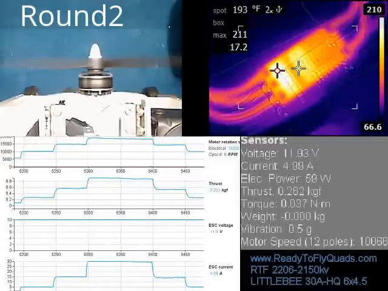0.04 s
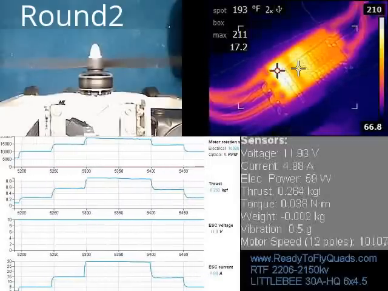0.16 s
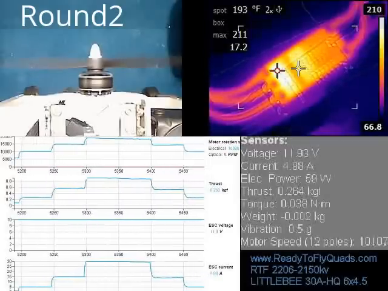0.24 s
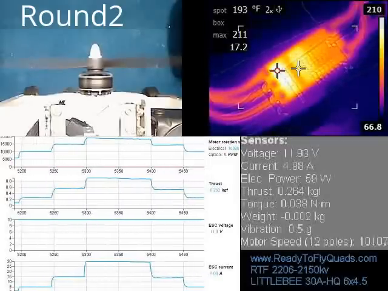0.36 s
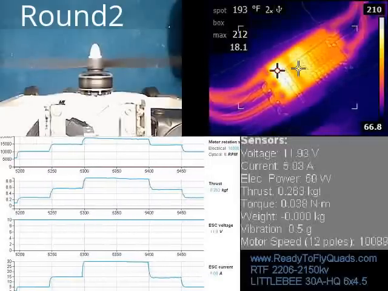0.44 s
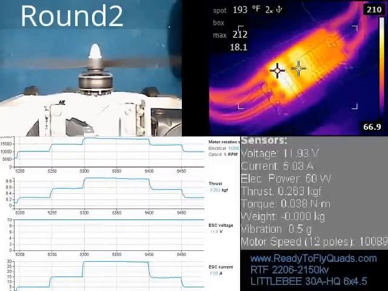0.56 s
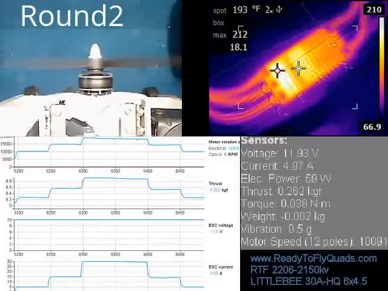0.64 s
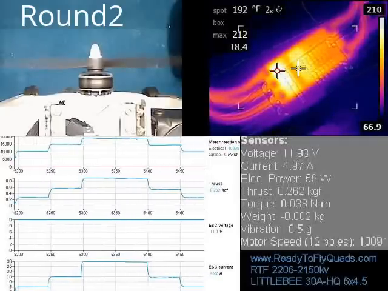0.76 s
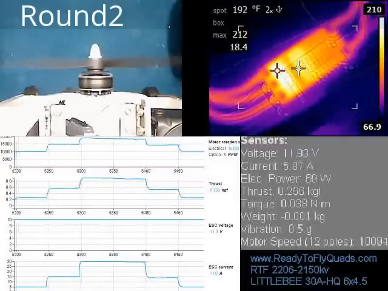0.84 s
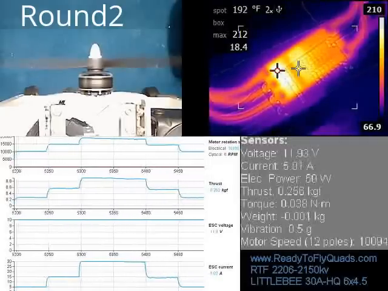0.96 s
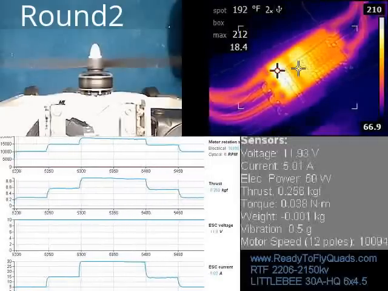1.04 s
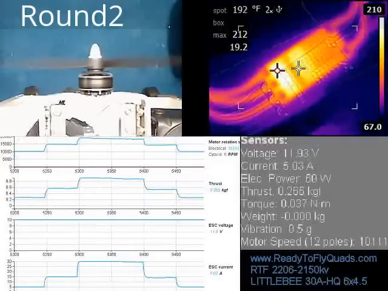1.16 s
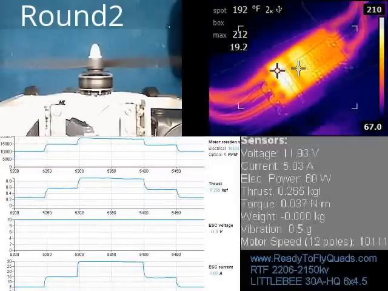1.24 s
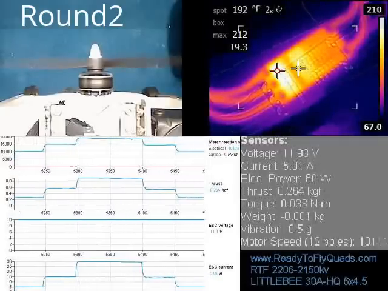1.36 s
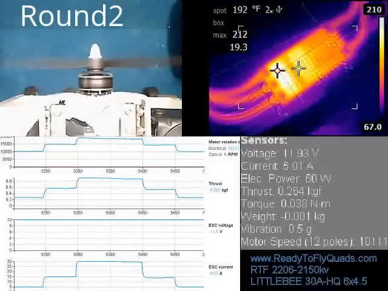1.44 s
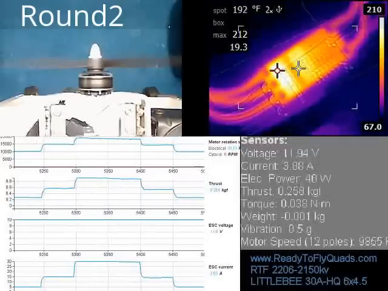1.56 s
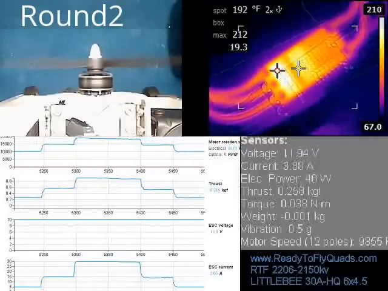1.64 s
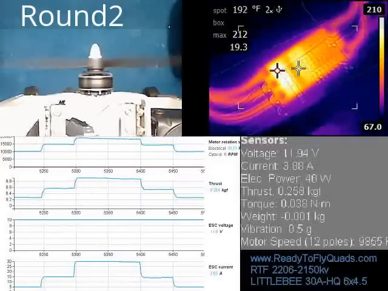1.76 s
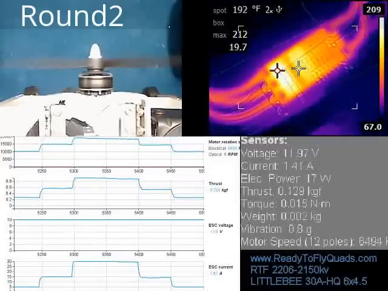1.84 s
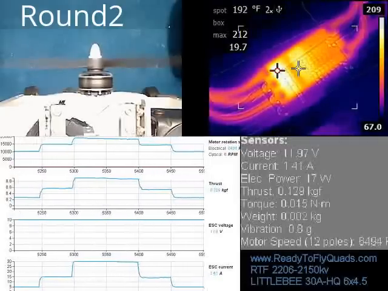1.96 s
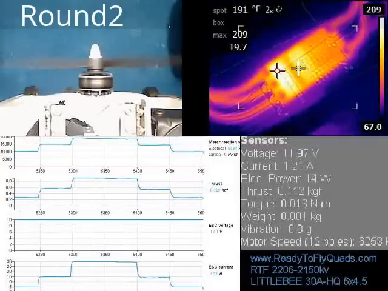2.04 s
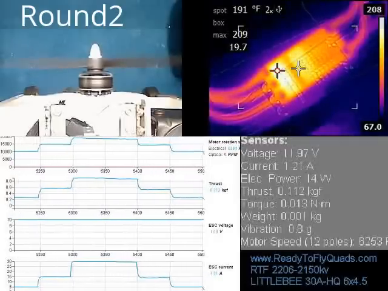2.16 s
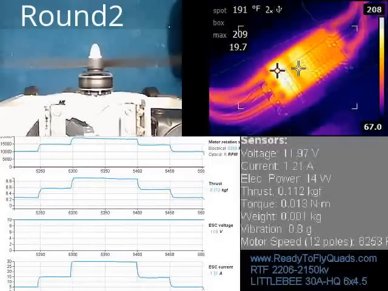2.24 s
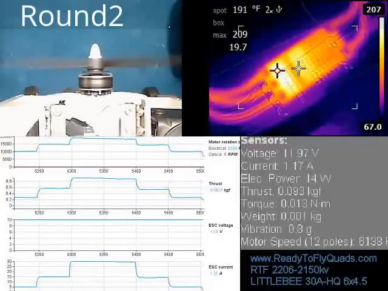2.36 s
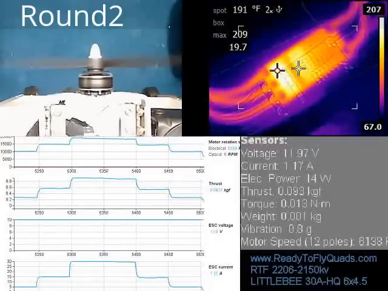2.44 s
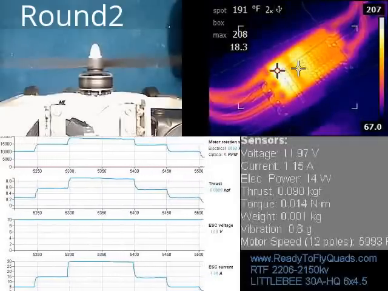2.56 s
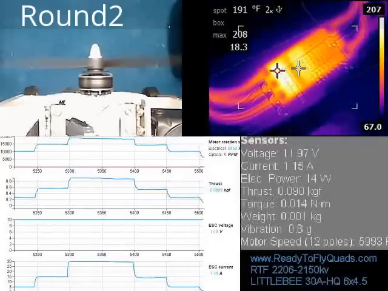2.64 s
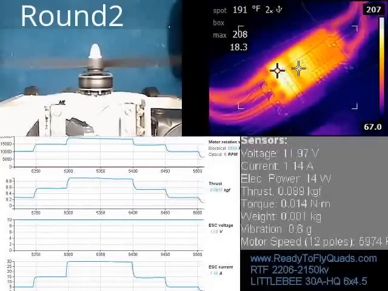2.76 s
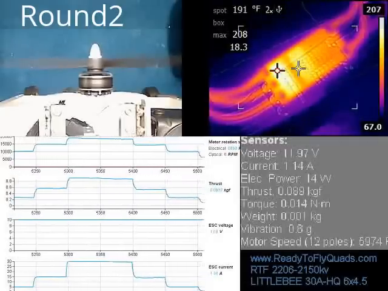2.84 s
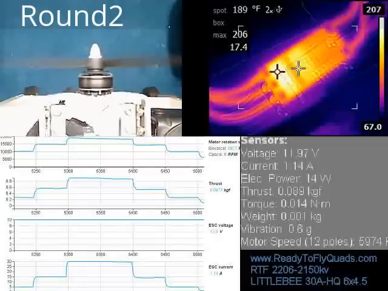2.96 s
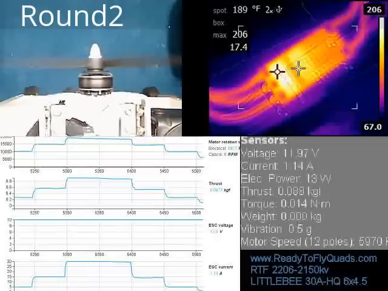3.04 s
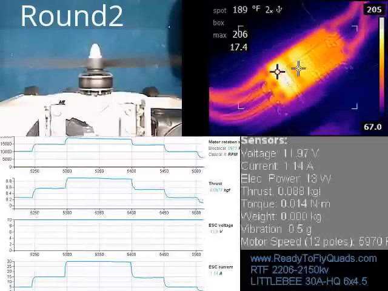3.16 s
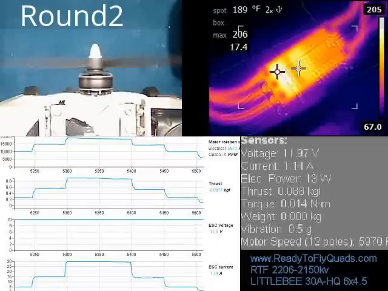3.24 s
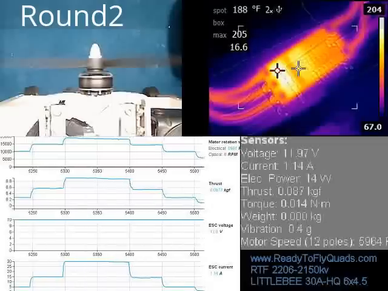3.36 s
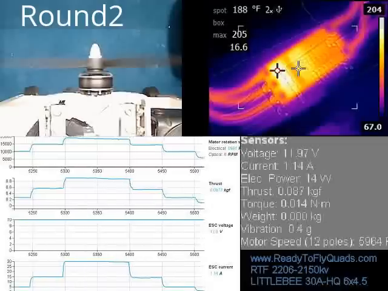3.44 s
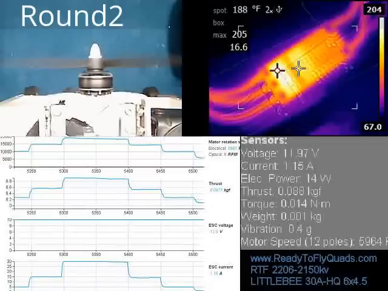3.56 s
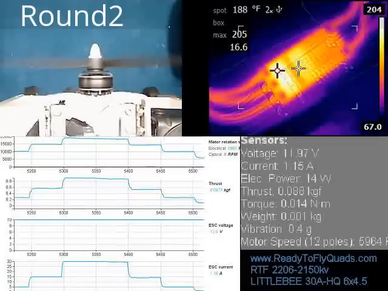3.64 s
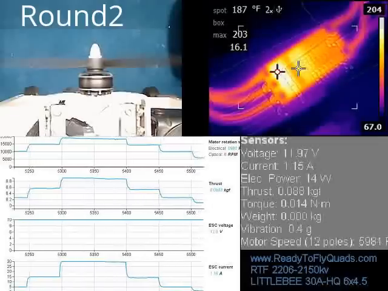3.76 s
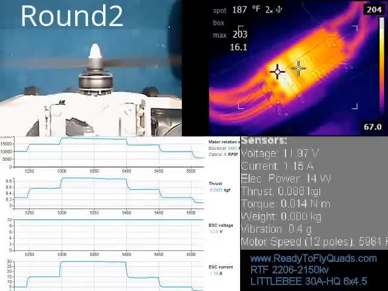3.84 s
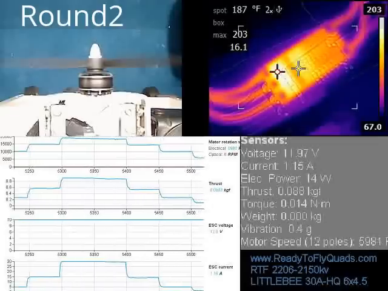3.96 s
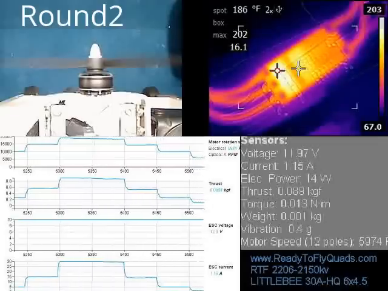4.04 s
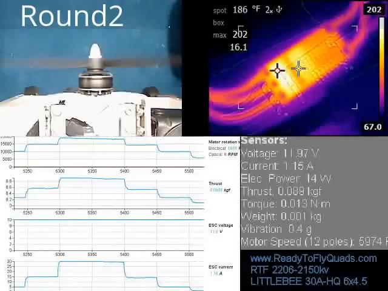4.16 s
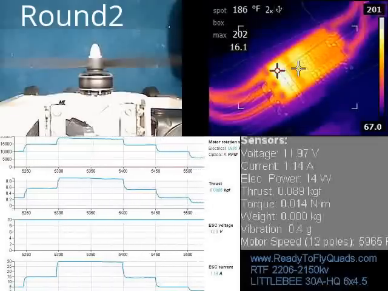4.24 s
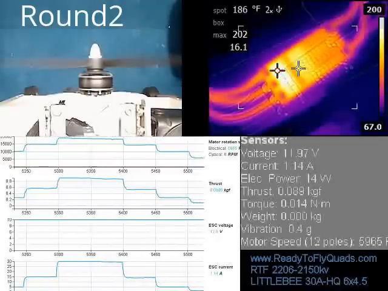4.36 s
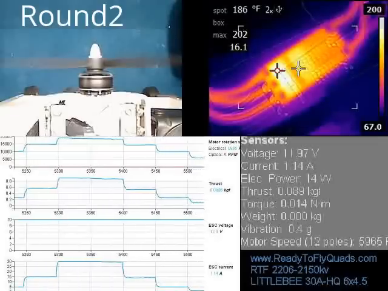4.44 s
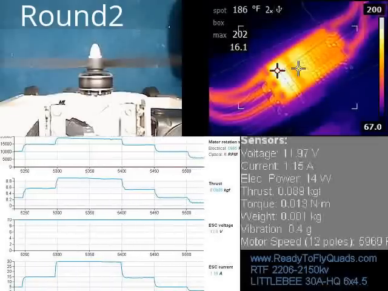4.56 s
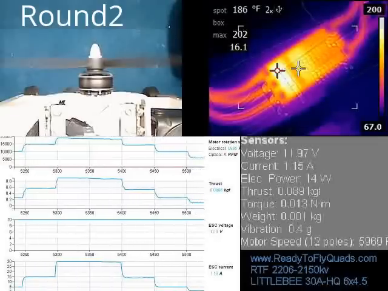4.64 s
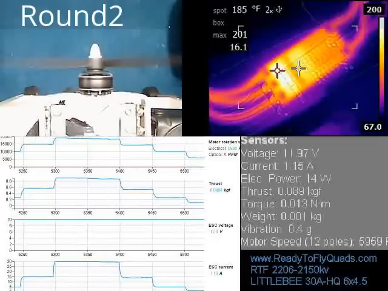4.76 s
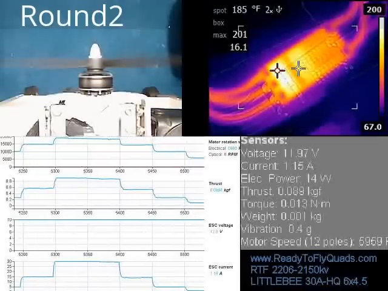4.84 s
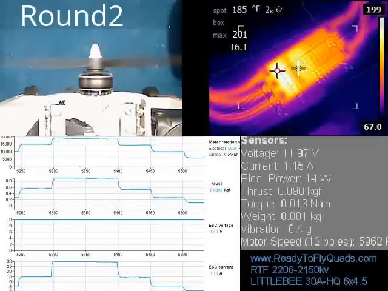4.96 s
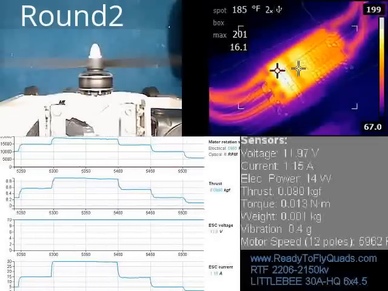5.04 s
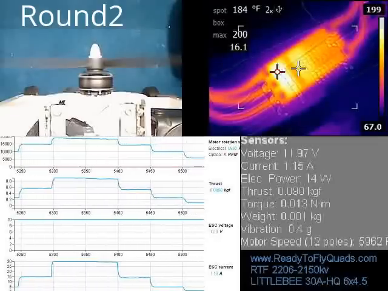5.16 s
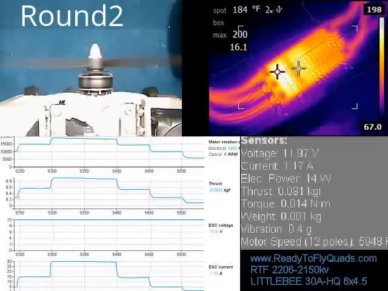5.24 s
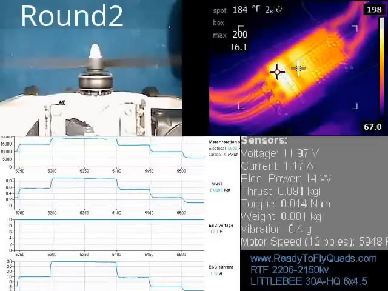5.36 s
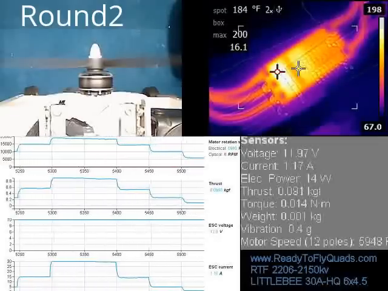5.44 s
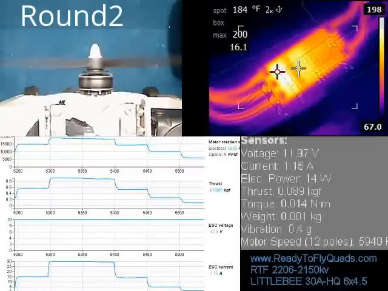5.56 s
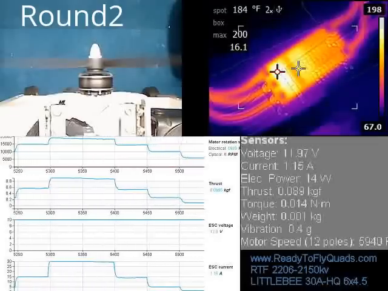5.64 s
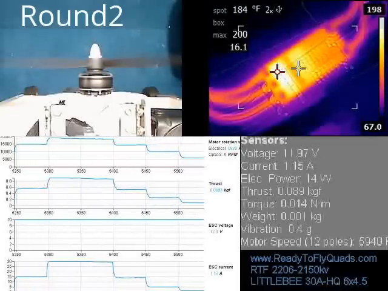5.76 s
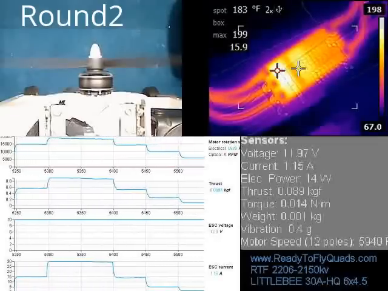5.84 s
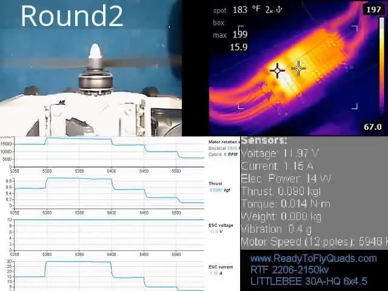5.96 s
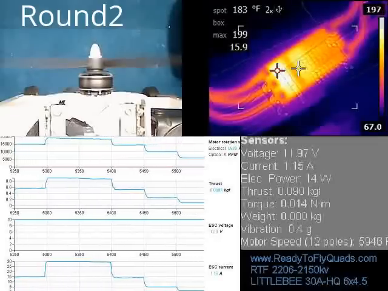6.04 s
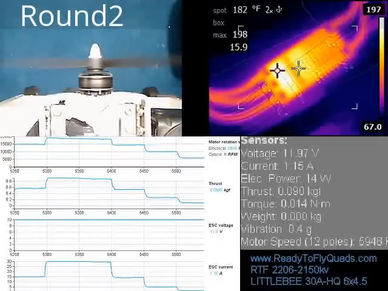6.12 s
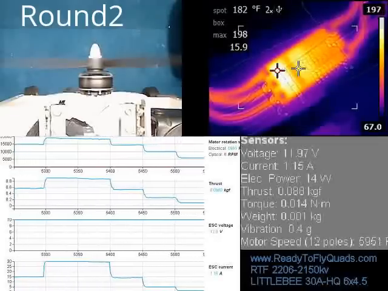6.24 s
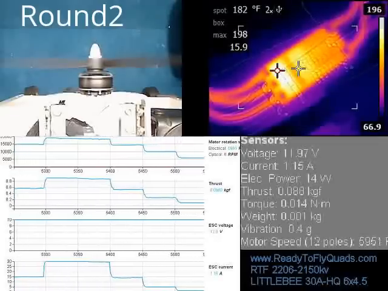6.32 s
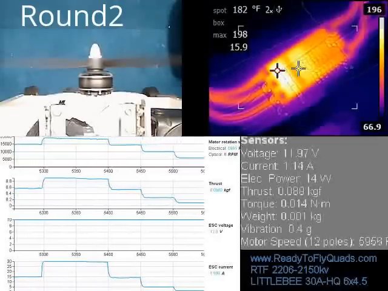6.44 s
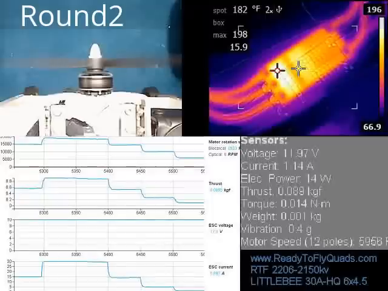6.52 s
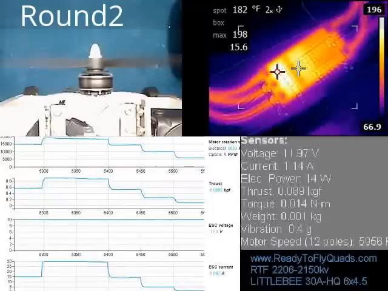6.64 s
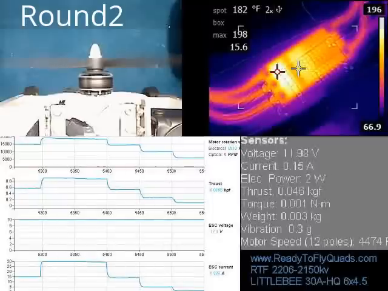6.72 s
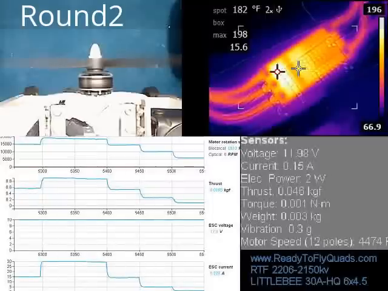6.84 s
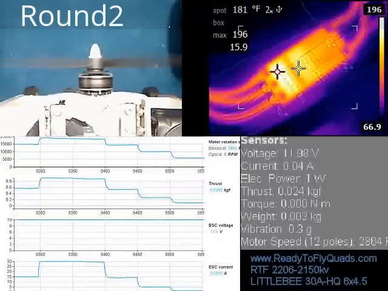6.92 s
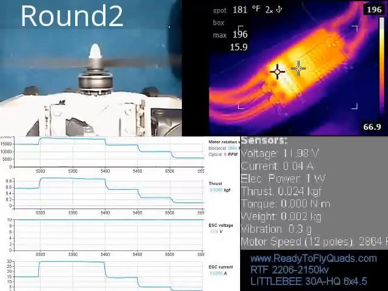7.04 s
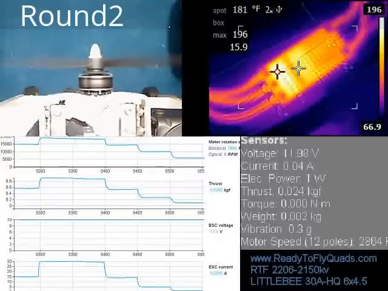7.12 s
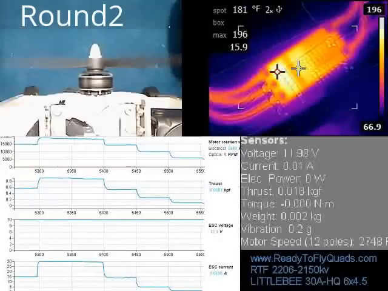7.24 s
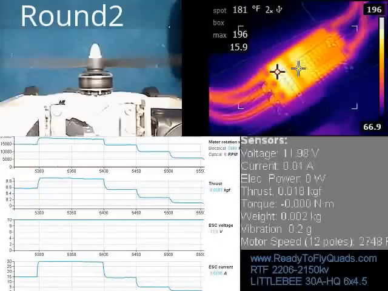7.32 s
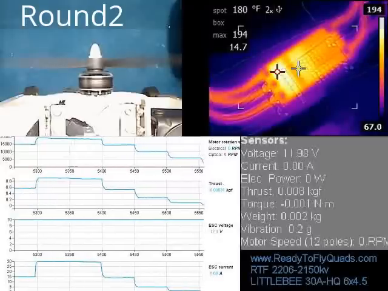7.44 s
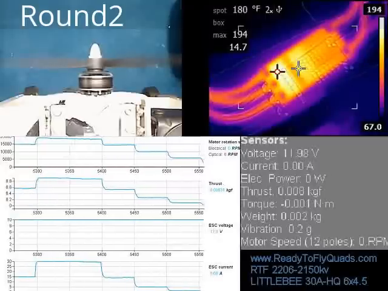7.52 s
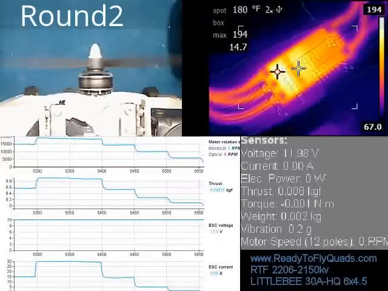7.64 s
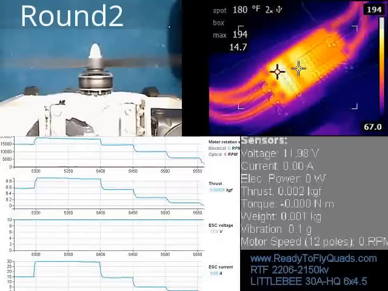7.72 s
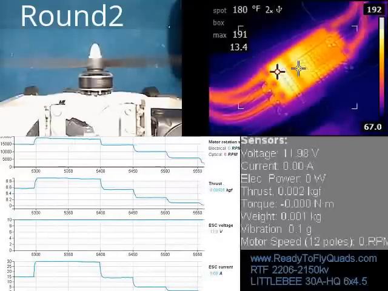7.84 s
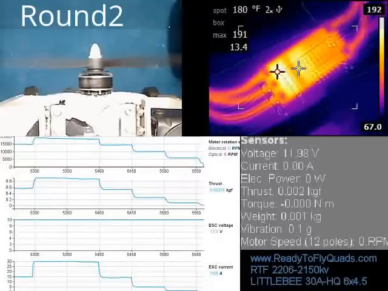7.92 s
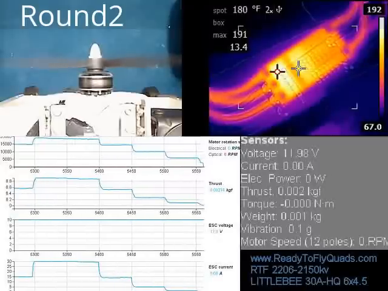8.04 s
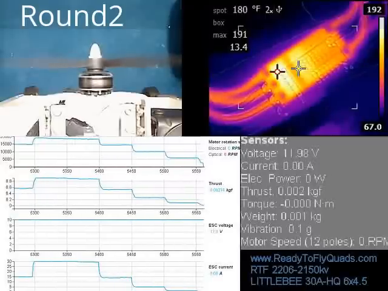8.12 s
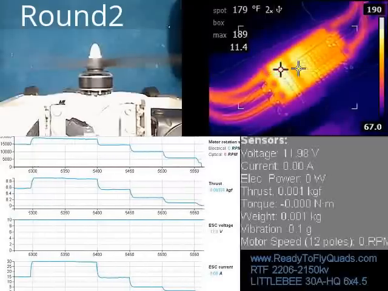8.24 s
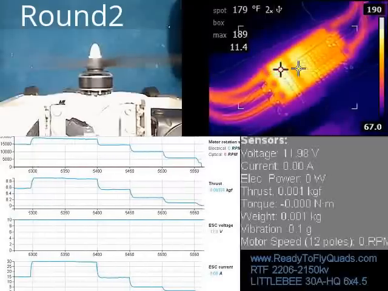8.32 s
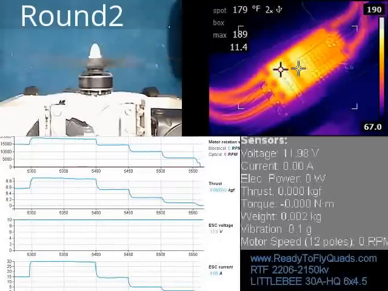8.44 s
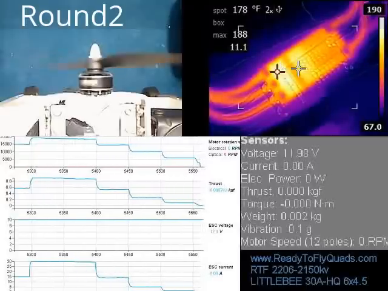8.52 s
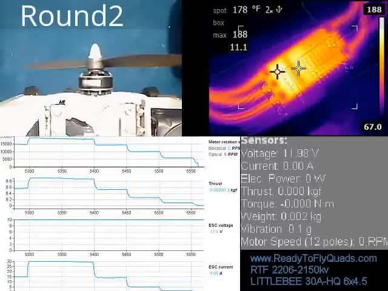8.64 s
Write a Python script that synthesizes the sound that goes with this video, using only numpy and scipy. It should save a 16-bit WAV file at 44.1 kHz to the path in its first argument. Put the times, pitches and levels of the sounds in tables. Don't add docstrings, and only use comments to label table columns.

```python
import sys
import numpy as np
from scipy import signal
from scipy.fft import rfft, irfft, next_fast_len
from scipy.io import wavfile
from scipy.ndimage import uniform_filter1d, map_coordinates

SR = 44100
rng = np.random.default_rng(int(sys.argv[2]) if len(sys.argv) > 2 else 0)


def wav_record(signal):
    frames = np.transpose(np.atleast_2d(signal))
    bounded = np.clip(frames, -1, 1)
    quanta = np.round(bounded * 32767).astype(np.int16)
    wavfile.write(sys.argv[1], SR, quanta)


def amplitude_ratio(level_db):
    exponent = np.asarray(level_db, float) / 20
    return 10 ** exponent


N = 382768

STEP_S, CUT_S = 1.261, 6.238
FAST_HZ, SLOW_HZ = 144.4, 85.2
WANTED_HZ = (143.5, 85.32)
DRAG, BRAKE_PULL_PER_S, COAST_PULL_PER_S = 0.029, 6.17, 0.3
# time in seconds, shaft speed in Hz.
FAST_SPEED = [
    (0, 144),
    (.5, 144),
    (.7, 144.3),
    (1.1, 144.5),
    (1.26, 145.4),
]
# time in seconds, shaft speed in Hz.
SLOW_SPEED = [
    (2.2, 85.6),
    (3.36, 85.2),
    (3.4, 85.69),
    (3.6, 85.16),
    (3.66, 85.6),
    (3.76, 85.33),
    (4.65, 85.23),
    (5.25, 84.75),
    (6.241, 85.38),
]

LOADING_ORDERS = [3, 4, 5, 6, 7, 11, 13, 15, 17, 21]
# level when fast, level when slow, in dB against the blade tone.
LOADING_LEVELS = [(-32.5, -31), (-17.5, -13.5), (-43.5, -29.5), (-31.5, -28.5), (-51.5, -42.5),
                  (-42, -41.5), (-40.5, -49), (-40.5, -50.5), (-37, -53), (-39, -40.5)]
# time in seconds, shift in dB.
IMBALANCE_SHIFT = [
    (1.3, 7.5),
    (1.8, 8.5),
    (3.0, 6),
    (4.85, 4),
    (5.45, -4),
    (6.2, 3),
    (6.32, -6),
    (6.7, -1),
]

# shaft order, level when fast in dB, level when slow in dB.
EDDY_COLOUR = [(1.01, -36, -30), (3.86, -11.5, -2), (5.4, -5.5, 5.5), (8.04, -1, 0.5), (10, -6.5, 7),
               (14.1, -3.5, 4), (23.6, 0.5, 1), (30, -1.5, 1.5), (41.3, -5.5, 1), (64, -11, -3.5),
               (101, -17, -7), (190, -29.5, -12.5)]
# frequency in Hz, density in dB per Hz.
HISS_COLOUR = [(30, 5.5), (70, 8), (130, 1), (300, 4), (700, 3), (1500, -1), (3500, 4.5), (4500, -3),
               (6200, 2.5), (8000, -11.5)]
PER_TURN = 384

COIL_ORDERS = [14, 39, 40, 41, 42, 43, 44, 56, 63, 65, 70, 72, 80, 84, 86, 88, 90]
# level when fast, level when slow, in dB against the main whine.
COIL_LEVELS = [(-21, -8.5), (-22.5, -27), (-25, -13.5), (-18, -21.5), (2, -1), (-22, -15), (-23, -9.5),
               (-38.5, -17), (-39, -18.5), (-39.5, -14), (-41, -7.5), (-39.5, -17.5), (-37.5, -21),
               (-34.5, -23), (-35.5, -24.5), (-44, -17.5), (-44.5, -20.5)]
# centre in Hz, width in Hz, gain in dB.
RIM_MODES = [(6092, 20, -5)]
# centre in seconds, half length in seconds, change in dB.
DROPOUTS = [
    (1.99, .03, -8),
    (3.407, 0.014, -10),
    (3.5, 0.024, -4.5),
    (3.66, 0.011, -10),
]

TUG_ORDERS = [49, 56, 70, 84]
TUG_LEVELS = [-41, -32, -50, -45]
# centre in Hz, width in Hz, gain in dB.
BELL_MODES = [(5370, 260, -5), (5600, 220, 0)]

SHAKE_ORDERS = [3, 11, 12, 13, 14, 24]
SHAKE_LEVELS = [-33, -52, -47.5, -47.5, -52, -65]
# centre in Hz, width in Hz, gain in dB.
SWAY_MODES = [(64, 3, -20)]
# centre in Hz, width in Hz, gain in dB.
ARM_MODES = [(314, 41.4, -1)]
# centre in Hz, width in Hz, gain in dB.
BENCH_MODES = [(296, 23, -4.5), (318, 40, -2.5), (400, 50, -4), (465, 51, -2), (840, 240, -6)]
# centre in Hz, width in Hz, gain in dB.
MOUNT_MODES = [(1100, 430, -27), (1980, 120, -29), (2700, 180, -33.5), (3250, 160, -37)]

# frequency in Hz, density in dB per Hz.
ROOM_COLOUR = [(15, -25.5), (25, 0), (53, -7.5), (93, -12), (170, -16.5), (192, -18.5), (472, -26),
               (748, -27), (2180, -37), (4970, -40), (8280, -40), (10800, -70.5), (18200, -120)]
# frequency in Hz, level in dB.
WHISTLES = [(4813, -93.5), (5130, -91), (6842, -93), (8000, -91)]


def unit(x):
    return x / np.sqrt(np.mean(x ** 2))


def shape(f, points):
    p = np.array(points, float)
    return amplitude_ratio(np.interp(np.log(f + 1e-9), np.log(p[:, 0]), p[:, 1]))


def noise(points):
    size = next_fast_len(N)
    white = rfft(rng.standard_normal(size))
    return unit(irfft(white * shape(np.fft.rfftfreq(size, 1 / SR), points), size)[:N])


def walk(rate, size=N):
    k = int(SR / rate)
    held = np.repeat(rng.standard_normal(size // k + 1), k)
    return unit(uniform_filter1d(uniform_filter1d(held, k), k)[:size])


def ring(x, modes):
    return sum(amplitude_ratio(db) * signal.lfilter(*signal.iirpeak(hz, hz / width, SR), x) for hz, width, db in modes)


def orders(turns, shaft_orders, levels_db, flutter_db, rate):
    total = np.zeros(N)
    for order, db in zip(shaft_orders, levels_db):
        level = amplitude_ratio(db + flutter_db * walk(rate))
        total += level * np.cos(2 * np.pi * (order * turns + rng.random()))
    return np.sqrt(2) * total


def blend(hz, fast, slow):
    return slow + (fast - slow) * np.clip((hz - SLOW_HZ) / (FAST_HZ - SLOW_HZ), 0, 1)


def settle(since_s, excess_hz, pull):
    growth = np.exp(pull * np.maximum(since_s, 0))
    return 1 / ((1 / excess_hz + DRAG / pull) * growth - DRAG / pull)


def shaft(t):
    fast = np.interp(t, *np.transpose(FAST_SPEED))
    slow = np.interp(t, *np.transpose(SLOW_SPEED))
    braked = slow + settle(t - STEP_S, fast[-1] - slow[0], BRAKE_PULL_PER_S)
    coasting = settle(t - CUT_S, slow[-1], COAST_PULL_PER_S)
    return np.where(t < STEP_S, fast, np.where(t < CUT_S, braked, coasting))


def blades(t, hz, turns, decades, slowing):
    tone_db = -10 + 50 * decades
    imbalance_db = -45 + 30.5 * decades + np.interp(t, *np.transpose(IMBALANCE_SHIFT))
    imbalance_db = imbalance_db - 8.5 * slowing * (t < CUT_S)
    pulse = amplitude_ratio(0.12 * walk(25)) * np.cos(4 * np.pi * turns)
    for order, db in zip(LOADING_ORDERS, LOADING_LEVELS):
        pulse += amplitude_ratio(blend(hz, *db) + 0.8 * walk(12)) * np.cos(2 * np.pi * order * turns)
    return np.sqrt(2) * (amplitude_ratio(tone_db) * pulse + amplitude_ratio(imbalance_db) * np.cos(2 * np.pi * turns))


def eddies(turns, colour, fade_order):
    size = next_fast_len(int(turns[-1] + 2) * PER_TURN)
    order = np.fft.rfftfreq(size, 1 / PER_TURN)
    echo = 0.93 * np.exp(-(order / fade_order) ** 2)
    gusts = rng.standard_normal(size) * amplitude_ratio(walk(35, size=size))
    comb = np.sqrt(1 - echo ** 2) / (1 - echo * np.exp(-1j * np.pi * order))
    by_angle = unit(irfft(rfft(gusts) * comb * shape(order, colour), size))
    return map_coordinates(by_angle, [turns * PER_TURN], order=3)


def chopped_eddies(hz, turns, slowing):
    order, fast_db, slow_db = np.transpose(EDDY_COLOUR)
    share = blend(hz, 1.0, 0)
    chop = np.sqrt(share) * amplitude_ratio(1.5) * eddies(turns, np.c_[order, fast_db], fade_order=52)
    chop += np.sqrt(1 - share) * eddies(turns, np.c_[order, slow_db], fade_order=39.5)
    return chop * amplitude_ratio(-5.5 * slowing)


def edge_hiss(hz, turns, slowing):
    hiss = noise(HISS_COLOUR) * amplitude_ratio(1.1 * slowing)
    dull = signal.sosfiltfilt(signal.butter(2, 2800, fs=SR, output="sos"), hiss)
    hiss = dull + np.minimum(hz / SLOW_HZ, 1) ** 2 * (hiss - dull)
    swish = 1 + (0.096 + 0.3 * slowing) * np.cos(4 * np.pi * turns)
    return amplitude_ratio(blend(hz, -8.5, -4.5)) * swish * hiss


def air(t, hz, turns, decades, slowing):
    stirred = (1 - blend(hz, 0.84, 0)) * np.exp(-np.maximum(t - STEP_S, 0) / 2.2)
    air_db = -27.5 + 48 * decades + 4 * slowing + 1.5 * stirred
    return amplitude_ratio(air_db) * (chopped_eddies(hz, turns, slowing) + edge_hiss(hz, turns, slowing))


def drive_db(t, hz):
    ahead = np.maximum(hz - np.where(t < STEP_S, *WANTED_HZ), 0)
    eased = ahead / (ahead + 0.91) * (-11.5 + 3.5 * walk(28))
    db = np.where(ahead < 2.1, blend(hz, -26, -38) + eased, -68.5)
    for centre_s, half_s, depth_db in DROPOUTS:
        db = db + depth_db * np.exp(-((t - centre_s) / half_s) ** 2)
    return uniform_filter1d(np.where(t < CUT_S + 0.01, db, -97), int(0.014 * SR))


def coil_whine(t, steady_hz, hz, turns):
    levels_db = [blend(hz, *db) for db in COIL_LEVELS]
    whine = amplitude_ratio(drive_db(t, steady_hz)) * orders(turns, COIL_ORDERS, levels_db, flutter_db=0.96, rate=27)
    return whine + ring(whine, RIM_MODES)


def slot_tone(hz, turns):
    speed = hz / SLOW_HZ
    gate = np.clip(200 * (speed - 1.003), 0, 1) * (speed < 1.2)
    return amplitude_ratio(-46) * gate * np.cos(2 * np.pi * 70 * turns)


def bearing_grit(turns):
    return rng.standard_normal(N) * (1 + 0.3 * np.cos(2 * np.pi * turns))


def bearing_buzz(turns, slowing):
    level = amplitude_ratio(-23.5 + 2.1 * walk(30)) * (1 - slowing)
    return ring(level * bearing_grit(turns), [(5340, 63, -2.5)])


def magnet_tug(hz, turns, slowing):
    tones = orders(turns, TUG_ORDERS, TUG_LEVELS, flutter_db=1.5, rate=40)
    tug = slowing * (hz / SLOW_HZ) ** 2.5 * tones
    return sum(ring(ring(tug, [mode]), [mode]) for mode in BELL_MODES)


def stand_shake(hz, turns, slowing):
    sway = ring(slowing * (hz / SLOW_HZ) ** 2 * np.cos(2 * np.pi * turns), SWAY_MODES)
    shake = slowing * orders(turns, SHAKE_ORDERS, SHAKE_LEVELS, flutter_db=5.5, rate=30)
    return sway + ring(ring(shake, ARM_MODES), ARM_MODES)


def loose_bearings(hz, turns, slowing):
    speed = hz / SLOW_HZ
    grit = bearing_grit(turns)
    knocks = signal.sosfilt(signal.butter(2, [200, 900], "bandpass", fs=SR, output="sos"), grit)
    level = amplitude_ratio(-21 + 1.1 * walk(8.5)) * slowing * np.minimum(speed, 0.5) ** 1.38
    rumble = ring(level * knocks, BENCH_MODES)
    return rumble + ring(slowing * np.minimum(speed, 0.7) ** 2.4 * grit, MOUNT_MODES)


def scene():
    t = np.arange(N) / SR
    steady_hz = shaft(t)
    log_slope = uniform_filter1d(np.gradient(np.log(steady_hz)), SR // 20) * SR
    slowing = np.clip(-log_slope / 0.5, 0, 1)
    decades = np.log10(steady_hz / FAST_HZ)
    hz = steady_hz * (1 + 0.000594 * walk(12))
    turns = 0.084 + np.cumsum(hz) / SR
    propeller = blades(t, hz, turns, decades, slowing)
    propeller = propeller + air(t, hz, turns, decades, slowing)
    motor = coil_whine(t, steady_hz, hz, turns) + slot_tone(hz, turns) + bearing_buzz(turns, slowing)
    braking = magnet_tug(hz, turns, slowing) + stand_shake(hz, turns, slowing)
    braking = braking + loose_bearings(hz, turns, slowing)
    room = amplitude_ratio(-56) * noise(ROOM_COLOUR)
    return (propeller + motor + braking + room)[None]


def top_cut(x):
    return signal.sosfilt(signal.butter(12, 8430, fs=SR, output="sos"), x)


def record(dry):
    t = np.arange(N) / SR
    cut = signal.sosfiltfilt(signal.butter(16, 7653, fs=SR, output="sos"), dry)
    whistles = sum(np.sqrt(2) * amplitude_ratio(db) * np.sin(2 * np.pi * hz * t) for hz, db in WHISTLES)
    offset = 0.0085 + 0.0012 * walk(1.3)
    return top_cut(cut + whistles + offset)


dry = scene()
out = record(dry)
wav_record(out)
```